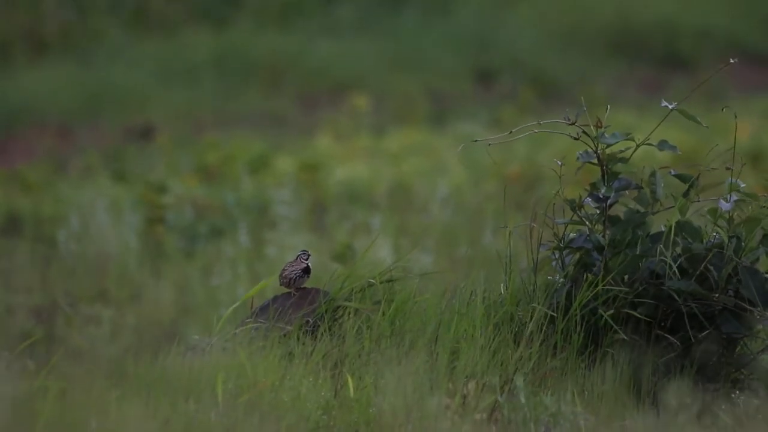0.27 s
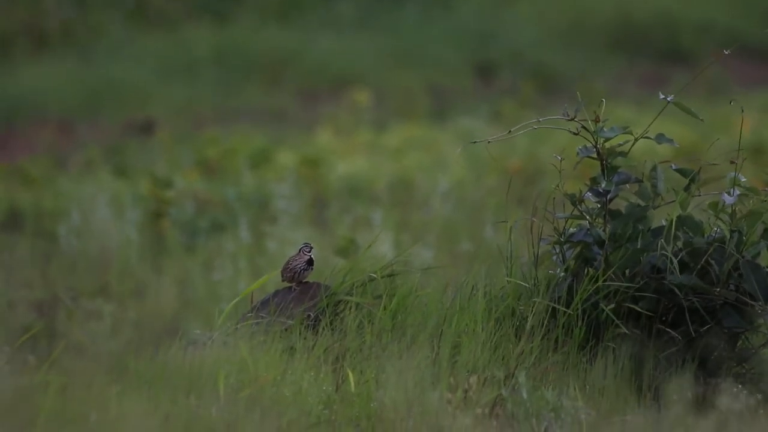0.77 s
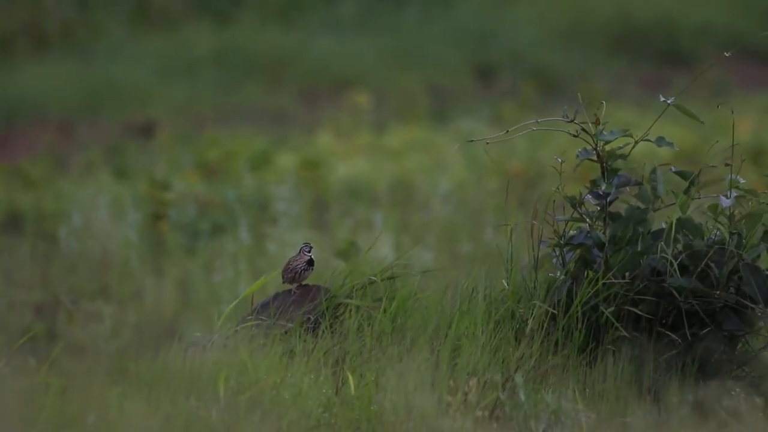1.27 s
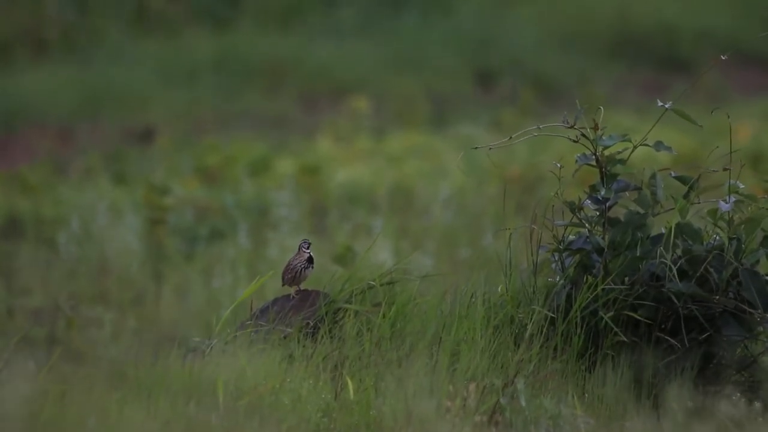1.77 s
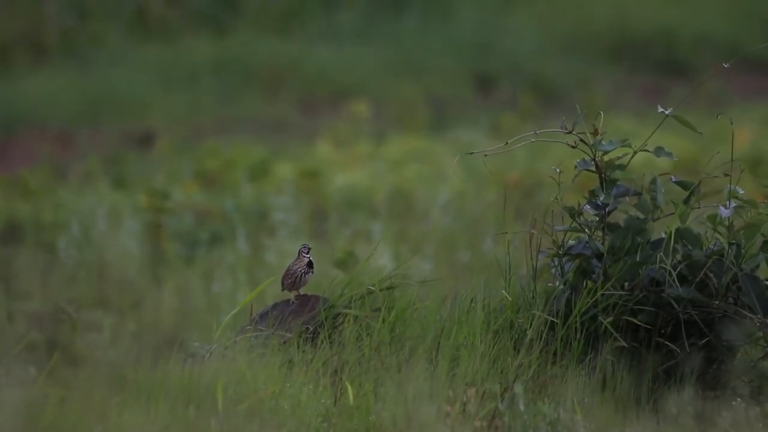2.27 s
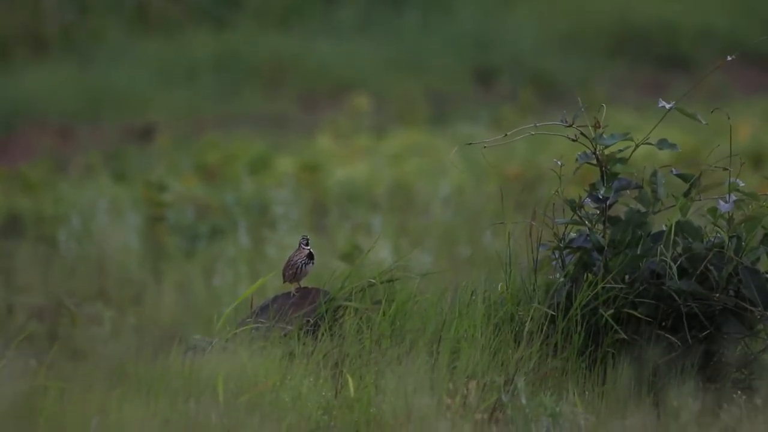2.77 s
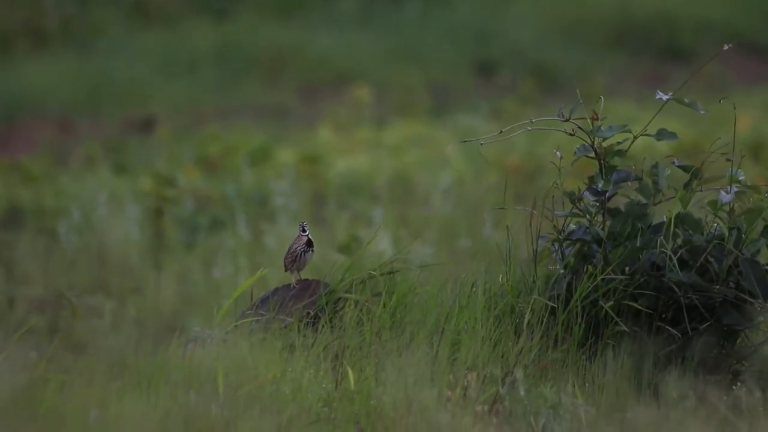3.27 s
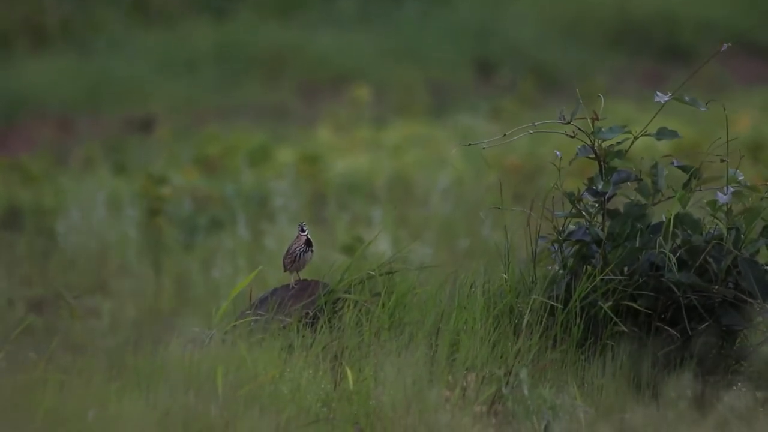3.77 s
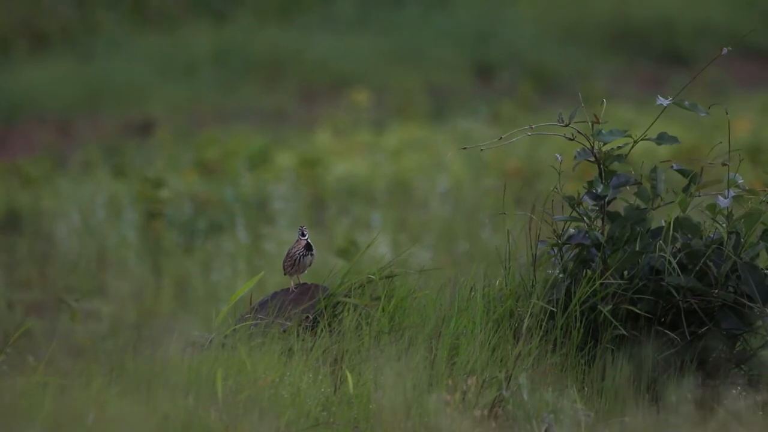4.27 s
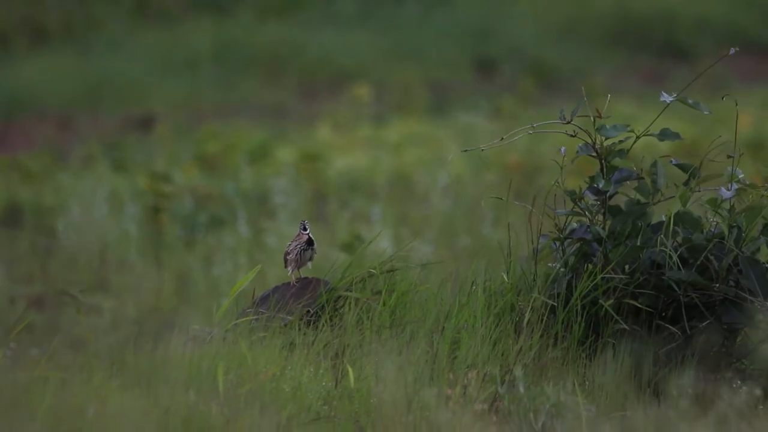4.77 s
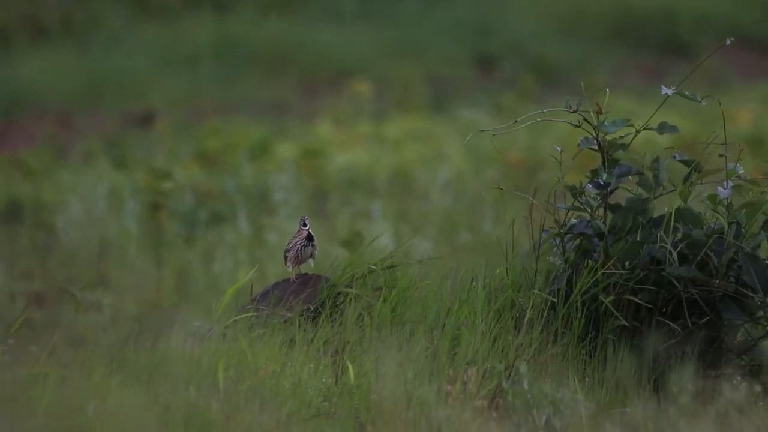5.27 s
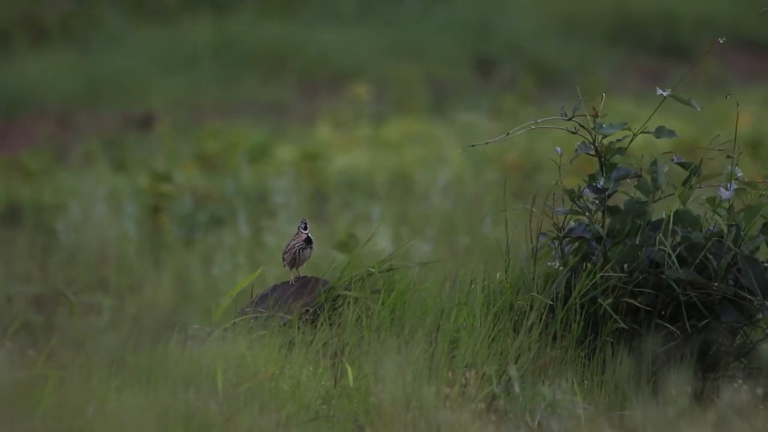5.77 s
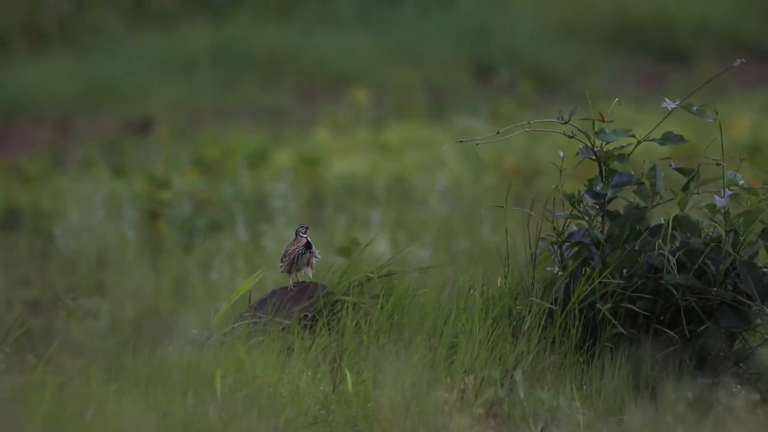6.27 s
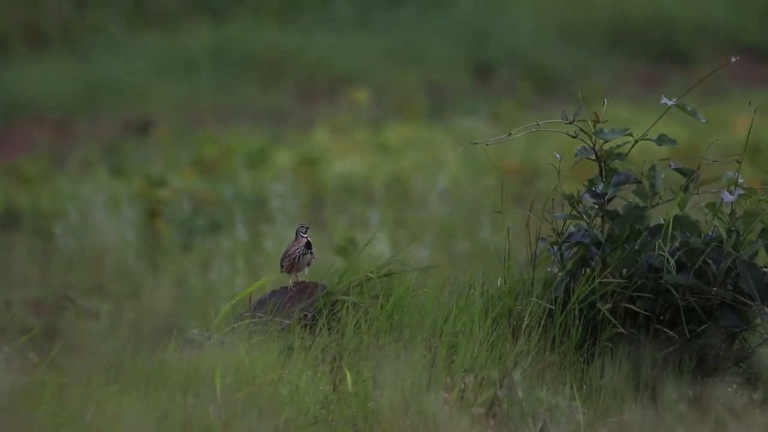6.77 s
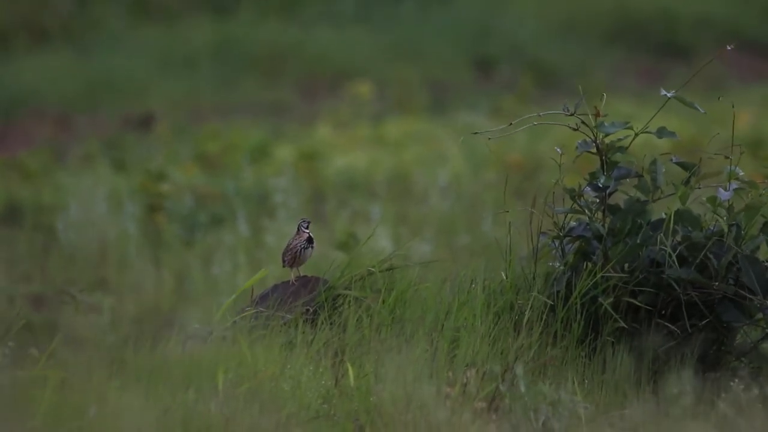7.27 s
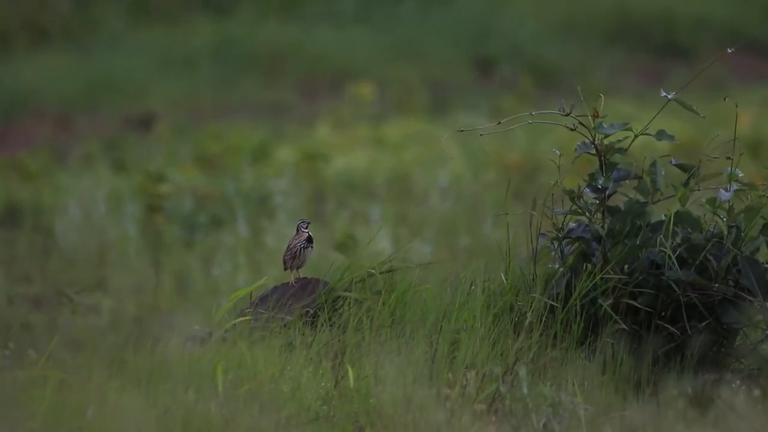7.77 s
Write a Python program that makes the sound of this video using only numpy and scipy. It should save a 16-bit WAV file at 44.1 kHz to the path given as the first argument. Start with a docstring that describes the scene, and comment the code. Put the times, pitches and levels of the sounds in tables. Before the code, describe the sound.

A small quail calls from a stone in open grassland: five pairs of short, piercing whistles that whip upward, about one and a half seconds apart. Far behind, another quail answers faintly, a warbler repeats quick slurred phrases and tiny birds chirp. Crickets and high insects buzz softly over a low hum. Wind only rumbles at first, then hard gusts thump and crack on the microphone around four seconds and again after seven. Outdoor mono pickup.

```python
"""Wet grassland: a rain quail on a stone gives five double whistles, scattered by the vegetation.
Each whistle is a swept sine that scoops, whips upward and breaks into comb-filtered hiss.
Far off: a second quail, a warbler's phrases of short sine slurs and small birds' chirps.
Crickets trill in gated falling tones, a chorus buzzes in pulsed noise bands, a distant hum is filtered noise.
Gusts buffet the microphone: shaped noise for eddies, single pressure pulses for slaps."""
import sys
import numpy as np
from scipy import signal
from scipy.fft import rfft, irfft
from scipy.io import wavfile
from scipy.ndimage import uniform_filter1d

SR = 44100
rng = np.random.default_rng(int(sys.argv[2]) if len(sys.argv) > 2 else 0)


def transcribe(u):
    """Save the signal u as a 16-bit wav file named by the first command-line argument.

    u: samples, shape (n,) or (channels, n), limited to [-1, 1]; the rate is SR.
    q: integer samples, one column per channel.
    """
    v = np.clip(np.atleast_2d(u).T, -1, 1)
    q = np.round(v * 32767).astype(np.int16)
    wavfile.write(sys.argv[1], SR, q)


N = 353152
TIME = np.arange(N) / SR

# near quail's notes: whip t/s, kind (row of NOTE_KINDS), level/dB, pitch ratio, rasp/dB, top of whip/dB
QUAIL_NOTES = [(1.4637, 0, -28, 1.024, -21, -8), (1.7127, 1, -18, 1, -16, 0.5),
               (2.9573, 0, -15.5, 1.002, -17, 6.5), (3.2073, 1, -12, 0.99, -3.5, 5.5),
               (4.4617, 0, -19.5, 1.001, -11.5, 3.5), (4.7144, 1, -13.5, 1.002, -13, 2.5),
               (5.9546, 0, -14, 1.0, -11, -7.5), (6.2059, 1, -11, 1, -13.5, -2.5),
               (7.4403, 0, -16.5, 1, -11.5, 0), (7.6921, 1, -12.5, 1.003, -11.5, -2)]
# far quail's notes: same columns
FAR_QUAIL_NOTES = [(3.815, 2, -57, 1.0, -14, -4), (4.066, 2, -53, 1.0, -7, -8),
                   (5.172, 2, -46.5, 1.0, -15, 0), (5.431, 2, -46, 0.99, -13, 0),
                   (6.517, 2, -44.5, 0.99, -16, -6), (6.769, 2, -46, 1.0, -20, 1),
                   (7.866, 2, -43.5, 0.97, -20, 1)]
# note kinds 0 opening, 1 answering, 2 far: start before whip/s, attack/s, attack curve (over 1 = slow start),
# lowest pitch before whip/s, lowest f/Hz and top f/Hz at pitch ratio 1, end after whip/s
NOTE_KINDS = [(.081, .056, 2.1, .031, 3125, 6600, .022), (.0518, .015, .9, .043, 3072, 6500, .017),
              (.075, .035, 1.3, .042, 3300, 7600, .036)]
# warbler syllables: t from main slur/s, length/s, nominal start f/Hz, middle f/Hz, end f/Hz,
# level/dB, part (0 falling, 1 rising)
WARBLER_SYLLABLES = [(-.078, .022, 3600, 3720, 3800, -15, 0), (-.055, .022, 4000, 4000, 3750, -11, 0),
                     (-.038, .026, 4400, 4350, 4050, -7, 0), (-.018, .031, 4800, 4480, 3700, 0, 0),
                     (.003, .022, 4050, 3480, 3080, -9, 0), (.028, .022, 5850, 5500, 4500, -7, 1),
                     (.042, .058, 5500, 5740, 6480, -1, 1), (.066, .047, 3950, 3850, 3000, -13, 1)]
# warbler phrases: t/s, falling part level/dB, rising part level/dB
WARBLER_PHRASES = [(-.02, -50, -44.5), (0.289, -40, -50.5), (0.621, -44, -53), (0.926, -49, -47.5),
                   (1.231, -42, -46), (1.544, -50, -51), (1.86, -41, -45.5), (2.173, -42, -41),
                   (2.503, -31.5, -43), (2.835, -37.5, -44), (5.588, -38, -39.5), (5.885, -37, -35.5),
                   (6.179, -34, -43.5), (6.478, -36.5, -39), (6.787, -44, -40), (7.08, -31.5, -43.5),
                   (7.388, -36.5, -48.5), (7.694, -34, -40.5)]
# clear chirps of other small birds: t/s, length/s, start f/Hz, end f/Hz, level/dB
CLEAR_CHIRPS = [(.016, .059, 4200, 3400, -53), (2.197, .059, 4380, 3500, -50),
                (2.342, .058, 4150, 3300, -51), (3.53, .014, 5530, 4400, -52), (3.59, .04, 5600, 4900, -57),
                (4.015, .026, 4000, 5200, -49), (4.32, .02, 5600, 4900, -55),
                (5.276, .046, 5200, 5650, -54), (5.8, .008, 8300, 7100, -51),
                (5.827, .013, 5600, 3900, -41.5), (7.305, .035, 3620, 3780, -49),
                (7.972, .04, 4200, 4600, -47)]
# ends of the cricket's equal trills: t/s
TRILL_ENDS_S = [.397, 1.872, 3.445, 4.92, 6.408, 7.88]
# high insect chorus, its level sinking while gusts and other loud sounds are heard: t/s, level/dB
CHORUS_LEVEL = [(0.0, -63), (0.76, -63), (1.2, -68), (1.85, -64), (3.92, -64), (4.41, -69), (5.19, -69),
                (5.81, -63), (7.08, -65), (7.22, -71), (7.44, -72), (7.64, -71), (7.84, -64), (8.0, -63)]
# chorus voices: f/Hz, width/Hz, relative level/dB, mean pulse rate/(1/s)
CHORUS_BANDS = [(8990, 270, -3, 117), (8470, 520, -4, 117), (9290, 610, -11, 119)]
# gusts: hold start t/s, hold end t/s, level/dB, time to rise 20 dB/s, time to fall 20 dB/s
GUST_HOLDS = [(0, .03, -38, .1, .07), (.44, .6, -30.5, .48, .3), (.7, .74, -35, .1, .07),
              (1.17, 1.21, -41, .3, .35), (2.7, 3.08, -41.5, .5, .45), (3.7, 3.8, -39, .15, .1),
              (3.9, 3.97, -27, .25, .1), (4.02, 4.62, -20, .06, .26), (4.745, 4.84, -18.5, .05, .065),
              (4.95, 4.98, -34, .1, .16), (5.22, 5.45, -39.5, .2, .55), (6.85, 6.93, -42, .12, .1),
              (6.98, 7.0, -25.5, .07, .1), (7.225, 7.29, -19, .04, .15), (7.385, 7.63, -19.5, .04, .17),
              (7.795, 7.815, -20.5, .04, .14), (7.9, 8.01, -19, .08, .1)]
# bursts of small eddies inside the hard gusts: t/s, length/s, level/dB
BUFFET_BURSTS = [(4.015, .045, -27), (4.1, .015, -34), (4.223, .018, -20), (4.25, .012, -26.5),
                 (4.328, .008, -27), (4.408, .012, -31), (4.533, .006, -28), (4.578, .01, -22),
                 (4.613, .008, -27), (4.733, .012, -31), (4.832, .012, -31), (7.222, .03, -22.5),
                 (7.38, .02, -27), (7.455, .05, -27), (7.567, .05, -27.5), (7.783, .02, -34),
                 (7.889, .06, -30)]
# spectral shape of a breeze: f/Hz, relative density/dB per Hz
BREEZE_SPECTRUM = [(12, -45), (20, -39), (50, 7), (113, 10), (145, 6.5), (178, 0), (282, -13), (380, -50),
                   (450, -27.5), (580, -30), (990, -120)]
# spectral shape of a hard gust: f/Hz, relative density/dB per Hz
GUST_SPECTRUM = [(12, -29), (20, -42), (59, -28.5), (106, -1.5), (170, 2.5), (250, 0.5), (288, -2),
                 (407, -5.5), (489, -11), (664, -12), (920, -18.5), (1220, -28.5), (2040, -50),
                 (2600, -52.5), (3380, -66), (5720, -120)]
# strongest eddies slapping the microphone: t/s, pressure scale
EDDY_SLAPS = [(4.043, .5), (4.278, 1), (4.3357, .9), (4.3667, .87), (4.611, .9), (7.237, .5), (7.3834, 1),
              (7.396, .8), (7.613, .7), (7.804, .5)]
# sharpest buffet, a crack: t/s, signed pressure scale, decay constant/s
SHARP_CRACK = (4.2185, -1.15, .0003)
# still air over the field: f/Hz, density/dB per Hz
AIR_SPECTRUM = [(25, -75.5), (60, -82.5), (160, -89), (250, -86.5), (440, -78.5), (720, -82), (1020, -88.5),
                (2000, -93), (2900, -93), (5200, -99), (7400, -103), (10000, -106.5), (12500, -109),
                (15500, -111.5)]
# broad bands of the distant rush: f/Hz, width/Hz, relative level/dB, mean pulse rate/(1/s), pulse depth/dB
RUSH_VOICES = [(1240, 190, -6, 13, 5), (1580, 330, -2, 13, 2.5), (2370, 580, -3.5, 18, 6.5)]
# swells of the rush: t/s, half length/s, added level/dB
RUSH_HUMPS = [(2.6, .6, 4), (5.2, .5, 5), (5.8, .12, 10), (6.95, .4, 9)]
# swells of the hum: t/s, half length/s, added level/dB
HUM_HUMPS = [(0, .5, 6.5), (2.75, .5, 4.5), (6.4, .35, 3)]

# quail: scoop through the lowest pitch, then whip, weaker with height
SCOOP_HZ_PER_S2, WHIP_MIDDLE_S, WHIP_S = 200000, .0036, .0025
LOSS_DB_PER_OCTAVE, NOTE_RELEASE_S = -18, .011
ONSET_SHARP_HZ, ONSET_SETTLE_S = 400, .002
RASP_DB, RASP_DELAY_S, RASP_WIDTH_S = -8.5, .01, .012  # level before each note's own
CRICKET_HZ, STROKES_PER_S = 6500, 129
TRILL_S, TRILL_DB, SWELL_S = .63, -58.5, .36
# fine turbulence: FINE_DB at a gust of HARD_DB, then dB gained per dB of gust
HARD_DB, FINE_DB, FINE_GROWTH = -18, -36, 1.8
BUFFET_ATTACK_S, BUFFET_DECAY_S = .003, .007
THUMP_DB = 6.5  # above the small eddies
SLAP_WIDTH_S = .0005
CUTOFF_HZ = 15800


def quail(notes, second_db, fourth_db, waver, tone_db=.4, top_gain_db=2.5,
          strained_second_db=16.0, break_db=4.5, rasp_spacing_hz=1020):
    """A nearly pure whistle dips, whips up about an octave and breaks into a rasp."""
    out = np.zeros(N)
    rasp_band = signal.ellip(6, 1, 60, [3000, 7150], "band", fs=SR, output="sos")
    hiss = signal.sosfilt(rasp_band, rng.standard_normal(N))
    hiss = rms_one(hiss + np.roll(hiss, int(SR / rasp_spacing_hz)))  # comb: rough bands
    wobble, flutter = drift(190), drift(200)
    for s, kind, level_db, ratio, rasp_db, top_db in notes:
        lead_s, attack_s, curve, dip_s, low_hz, top_hz, end_s = NOTE_KINDS[round(kind)]
        near = np.abs(TIME - s) < .1
        t = TIME[near] - s
        # pitch
        onset_hz = ONSET_SHARP_HZ * np.exp(-np.maximum(t + lead_s, 0) / ONSET_SETTLE_S)
        scoop_hz = low_hz + SCOOP_HZ_PER_S2 * (t + dip_s) ** 2 + onset_hz
        climb = 1 / (1 + np.exp(-(t - WHIP_MIDDLE_S) / WHIP_S))
        strain = np.minimum(2 * climb, 1)  # the voice grows unsteady as it climbs
        pitch_hz = (scoop_hz + (top_hz - scoop_hz) * climb) * ratio * (1 + waver * wobble[near])
        phase = 2 * np.pi * np.cumsum(pitch_hz) / SR
        # harmonics
        second = from_db(second_db + strained_second_db * strain * (1 - climb)) * np.sin(2 * phase)
        fourth = from_db(fourth_db) * np.sin(4 * phase) * (1 - strain)
        tone = np.sin(phase) + second + fourth
        # level
        attack = np.sin(np.pi / 2 * np.clip((t + lead_s) / attack_s, 0, 1)) ** curve
        release = np.clip((end_s - t) / NOTE_RELEASE_S, 0, 1)
        loss_db = LOSS_DB_PER_OCTAVE * np.log2(pitch_hz / (low_hz * ratio))
        whip_db = top_gain_db * climb ** 2 + strain * (top_db + break_db * flutter[near])
        tone = tone * attack * release * from_db(loss_db + whip_db)
        rasp_swell = np.exp(-((t - RASP_DELAY_S) / RASP_WIDTH_S) ** 2)
        rasp = hiss[near] * from_db(RASP_DB + rasp_db) * rasp_swell
        out[near] += from_db(level_db) * (from_db(tone_db) * tone + rasp)
    return out


def meadow(x, scatter_db, t60_s, bush_db, bush_s, blade_hz):
    """Grass scatters a thin dying tail, mostly of short waves; bushes return a soft cluster of echoes."""
    t = TIME[:SR]
    tail = from_db(scatter_db - 60 * t / t60_s) * (1 - np.exp(-t / .0016))
    bushes = from_db(bush_db) * np.exp(-((t - bush_s) / .082) ** 2)
    echoes = rng.standard_normal(SR) * (tail + bushes) / np.sqrt(SR / 10)
    echoes = signal.sosfilt(signal.butter(2, blade_hz, "high", fs=SR, output="sos"), echoes)
    return x + signal.fftconvolve(x, echoes)[:N]


def warbler(variation=.01, spread_db=2.5):
    """Quick falling slurs and a rising whistle, a little different in every phrase."""
    out = np.zeros(N)
    for s, *part_db in WARBLER_PHRASES:
        for offset_s, length_s, start_hz, middle_hz, end_hz, db, part in WARBLER_SYLLABLES:
            u = np.linspace(0, 1, int(length_s * SR))
            curve = np.polyfit([0, .5, 1], [start_hz, middle_hz, end_hz], 2)
            hz = np.polyval(curve, u) * (1 + variation * rng.normal())
            gain = from_db(part_db[round(part)] + db + spread_db * rng.normal())
            swell = np.abs(np.sin(np.pi * u ** 1.76))
            add(out, s + offset_s, gain * swell * np.sin(2 * np.pi * np.cumsum(hz) / SR))
    return out


def far_chirps(level_db=-59.5, spread_db=3.5, count=170):
    """A few clear chirps over many faint, randomly placed falling ones."""
    out = np.zeros(N)
    for s, length_s, start_hz, end_hz, db in CLEAR_CHIRPS:
        add(out, s, from_db(db) * chirp(length_s, start_hz, end_hz))
    for when, pitch, length, fall, size in rng.random((count, 5)):
        hz = 4000 + 2100 * pitch
        gain = from_db(level_db + spread_db * (2 * size - 2.5))
        add(out, when * N / SR, gain * chirp(.012 + .041 * length, hz, hz * (1 - .25 * fall)))
    return out


def chirp(length_s, start_hz, end_hz):
    """One short, softly rounded slur."""
    u = np.linspace(0, 1, max(int(length_s * SR), 2))
    hz = start_hz + (end_hz - start_hz) * u
    return np.sin(np.pi * u) * np.sin(2 * np.pi * np.cumsum(hz) / SR)


def cricket(sweep_hz=170, start_db=-13):
    """Each wing stroke is a short falling tone; a trill swells and stops at once."""
    stroke = np.cumsum(STROKES_PER_S * (1 + .014 * drift(6.9))) / SR % 1
    pitch_hz = CRICKET_HZ + sweep_hz * (1 - 2 * stroke) + 55 * drift(150)
    tone = np.sin(np.pi * stroke) ** 2 * np.sin(2 * np.pi * np.cumsum(pitch_hz) / SR)
    level = np.zeros(N)
    for end_s in TRILL_ENDS_S:
        start_s = end_s - TRILL_S
        swell_db = start_db * np.clip(1 - (TIME - start_s) / SWELL_S, 0, 1)
        level += from_db(TRILL_DB + swell_db) * (TIME > start_s) * (TIME < end_s)
    return rms_one(tone) * uniform_filter1d(level, size=300)


def chorus(depth=.75):
    """Many high insects merge into buzzing bands."""
    voices = np.zeros(N)
    for hz, width_hz, db, pulses_per_s in CHORUS_BANDS:
        rate = pulses_per_s * (1 + .018 * drift(4))
        pulses = 1 + depth * np.sin(2 * np.pi * np.cumsum(rate) / SR)
        voices += from_db(db) * rms_one(narrow_noise(hz, width_hz) * pulses)
    return voices * from_db(in_time(CHORUS_LEVEL)[0])


def wind(lumps_db=3.5, fine_lumps_db=4.5, split_hz=650, unsteady_db=4.0, unsteady_per_s=18):
    """Lumpy turbulence: a breeze only rumbles, a hard gust adds small, fast eddies and breaks into buffets."""
    gust_power = np.zeros(N)
    for start_s, end_s, db, rise_s, fall_s in GUST_HOLDS:
        outside = np.maximum((start_s - TIME) / rise_s, (TIME - end_s) / fall_s)
        gust_power += from_db(db - 20 * np.maximum(outside, 0)) ** 2
    level_db = 10 * np.log10(gust_power + 1e-12) + unsteady_db * np.tanh(drift(unsteady_per_s))
    bursts = np.zeros(N)
    for s, length_s, db in BUFFET_BURSTS:
        attack = np.clip((TIME - s) / BUFFET_ATTACK_S + 1, 0, 1)
        decay = np.exp(-np.maximum(TIME - s - length_s, 0) / BUFFET_DECAY_S)
        bursts += from_db(db) * attack * decay
    hard = np.clip((level_db + 40) / 23, .1, 1) ** 1.5  # share of gust over breeze
    eddies, gust = drift(70), coloured(GUST_SPECTRUM)
    coarse = signal.sosfiltfilt(signal.butter(4, split_hz, fs=SR, output="sos"), gust)
    breeze = rms_one(coloured(BREEZE_SPECTRUM))
    rumble = np.sqrt(hard) * rms_one(coarse) + np.sqrt(1 - hard) * breeze
    rumble = evened(rumble * from_db(lumps_db * eddies), .05)
    rumble = rumble * np.hypot(from_db(level_db), from_db(THUMP_DB) * bursts)
    fine_gain = from_db(FINE_DB + FINE_GROWTH * (level_db - HARD_DB))
    flutter = evened((gust - coarse) * from_db(fine_lumps_db * eddies), .03)
    flutter = flutter * np.hypot(fine_gain, bursts)
    # the capsule passes little deep bass
    return signal.sosfilt(signal.butter(2, 50, "high", fs=SR, output="sos"), rumble + flutter)


def slaps():
    """An eddy crossing the port is one pressure pulse with a rebound on both sides; the sharpest has a cusp."""
    out, t = np.zeros(N), TIME[:SR // 50] - 1 / 100
    u = t / SLAP_WIDTH_S
    pulse = np.exp(-u ** 2) - np.exp(-(u / 4) ** 2) / 4
    for s, pressure in EDDY_SLAPS:
        add(out, s + t[0], pressure * pulse)
    s, pressure, decay_s = SHARP_CRACK
    add(out, s + t[0], pressure * uniform_filter1d(np.exp(-np.abs(t / decay_s)), size=2))
    return out


def field(hum_hz=615, hum_width_hz=80, hum_db=-54.5,
          drone_hz=160, drone_width_hz=45, drone_db=-58, rush_db=-63):
    """Still air, a faint chirring rush that swells, and a narrow distant hum over a low drone."""
    rush = np.zeros(N)
    for hz, width_hz, db, pulses_per_s, depth_db in RUSH_VOICES:
        rush += from_db(db + depth_db * pulsing(pulses_per_s)) * narrow_noise(hz, width_hz)
    rush = rush * from_db(rush_db + swells(RUSH_HUMPS))
    hum = narrow_noise(hum_hz, hum_width_hz) * from_db(hum_db + swells(HUM_HUMPS))
    drone = from_db(drone_db) * evened(narrow_noise(drone_hz, drone_width_hz), .08)
    return coloured(AIR_SPECTRUM) + rush + hum + drone


def pulsing(rate_per_s):
    """A swing between -1 and 1 at a slightly unsteady rate."""
    return np.sin(2 * np.pi * np.cumsum(rate_per_s * (1 + .15 * drift(3.8))) / SR)


def swells(rows):
    """A level in dB that rises and falls in smooth humps."""
    return sum(db * np.exp(-((TIME - s) / half_s) ** 2) for s, half_s, db in rows)


def coloured(spectrum):
    """Noise with the given power per Hz."""
    hz, db = np.transpose(spectrum)
    f = np.arange(N // 2 + 1) * SR / N + 1
    gain = from_db(np.interp(np.log(f), np.log(hz), db))
    return irfft(rfft(rng.standard_normal(N)) * gain, N) * np.sqrt(SR / 2)


def narrow_noise(hz, width_hz):
    """Band-passed noise at rms 1."""
    return rms_one(band(rng.standard_normal(N), hz - width_hz / 2, hz + width_hz / 2))


def band(x, low_hz, high_hz, order=2):
    """Butterworth band-pass."""
    edges_hz = [low_hz, min(high_hz, SR / 2 - 10)]
    return signal.sosfilt(signal.butter(order, edges_hz, "band", fs=SR, output="sos"), x)


def drift(rate_hz):
    """Low-passed chance with spread 1."""
    f = np.arange(N // 2 + 1) * SR / N
    return rms_one(irfft(rfft(rng.standard_normal(N)) / (1 + (f / rate_hz) ** 2), N))


def evened(x, span_s):
    """Hold a noise at rms 1 over short spans."""
    return x / np.sqrt(uniform_filter1d(x * x, max(int(span_s * SR), 2)) + 1e-20)


def rms_one(x):
    """Scale to rms 1."""
    return x / np.sqrt(np.mean(x ** 2) + 1e-20)


def from_db(db):
    """dB to amplitude."""
    return 10 ** (np.asarray(db) / 20)


def in_time(rows, t=TIME):
    """Interpolate each column of a table over time."""
    s, *columns = np.transpose(rows)
    return [np.interp(t, s, c) for c in columns]


def add(out, s, sound):
    """Mix a sound in from time s on."""
    i = int(round(s * SR))
    a, b = max(i, 0), min(i + len(sound), N)
    if b > a:
        out[a:b] += sound[a - i:b - i]


def scene():
    """Near quail, far birds, insects, wind and field in one channel."""
    near = quail(QUAIL_NOTES, second_db=-41, fourth_db=-54, waver=.002)
    near = meadow(near, scatter_db=-18, t60_s=.64, bush_db=-25.5, bush_s=.11, blade_hz=4250)
    far = quail(FAR_QUAIL_NOTES, second_db=-41, fourth_db=-53, waver=.004)
    far = far + warbler() + far_chirps()
    far = meadow(far, scatter_db=-1.5, t60_s=.33, bush_db=-28, bush_s=.3, blade_hz=2800)
    insects = cricket() + chorus()
    return (near + far + insects + wind() + slaps() + field())[None]


def record(dry):
    """The hardest buffets are rounded off; the top is cut."""
    rounded = dry / (1 + dry ** 6) ** (1 / 6)
    return signal.sosfilt(signal.ellip(12, .1, 90, CUTOFF_HZ, fs=SR, output="sos"), rounded)


dry = scene()
out = record(dry)
transcribe(out)
```